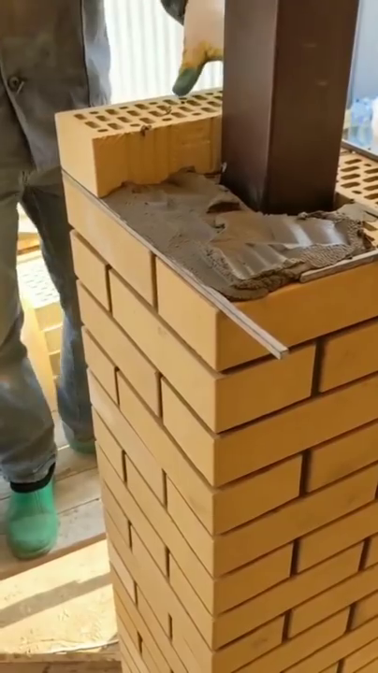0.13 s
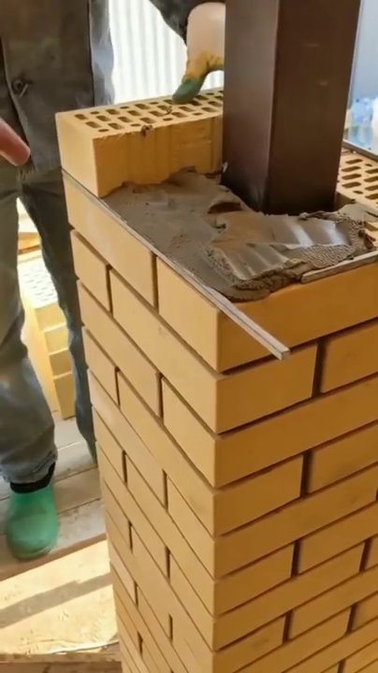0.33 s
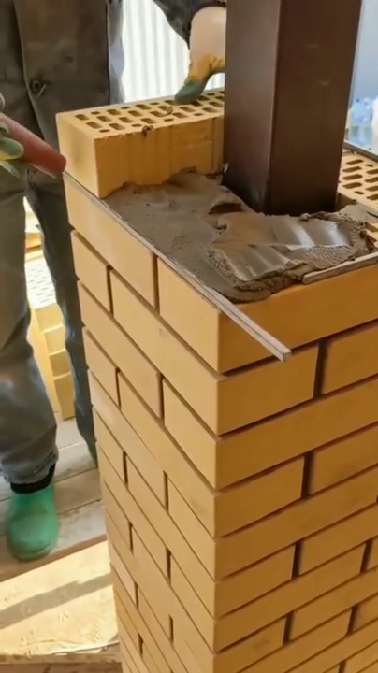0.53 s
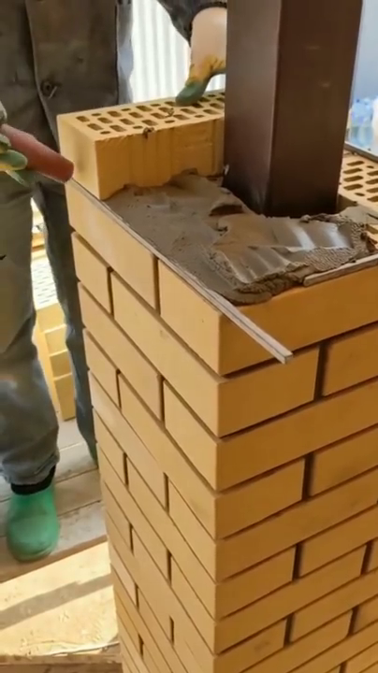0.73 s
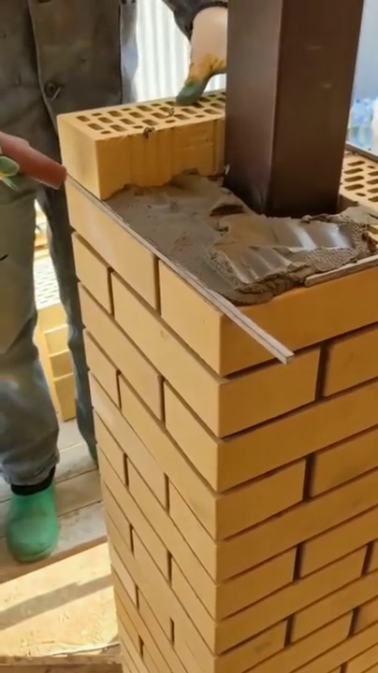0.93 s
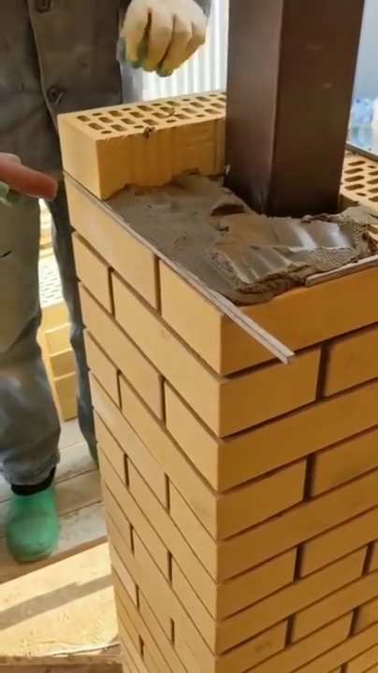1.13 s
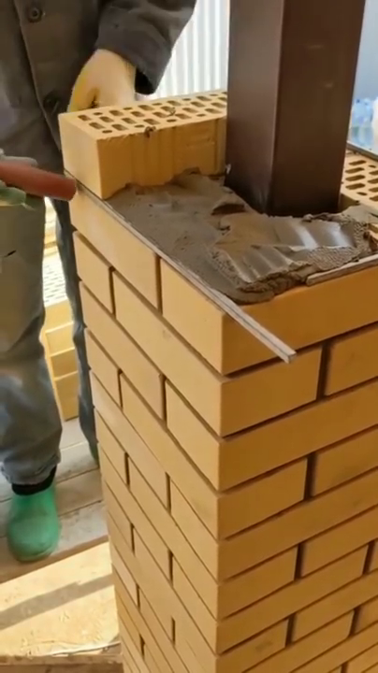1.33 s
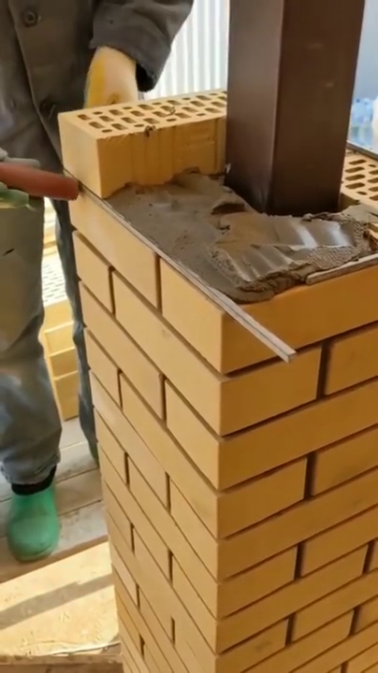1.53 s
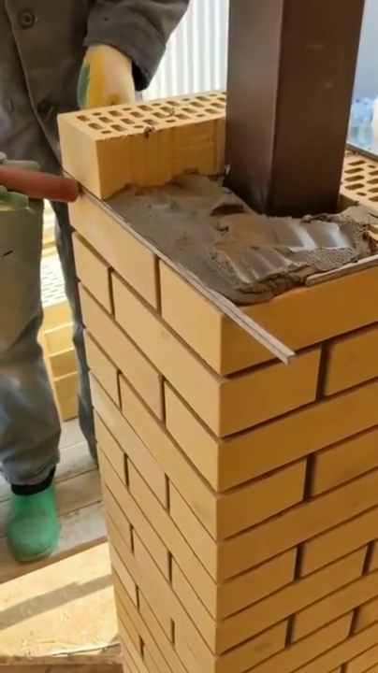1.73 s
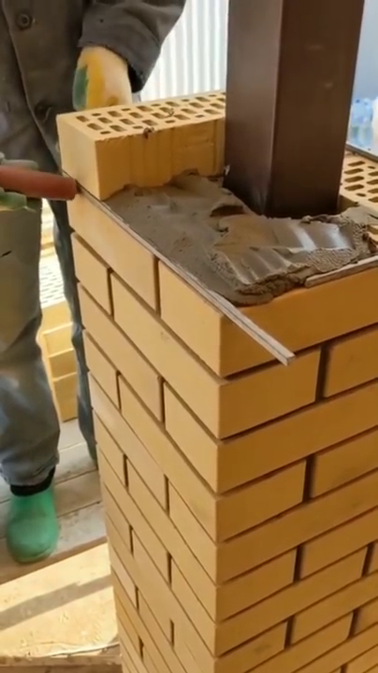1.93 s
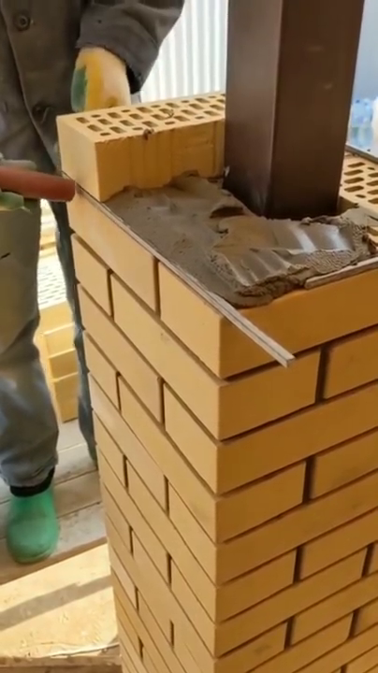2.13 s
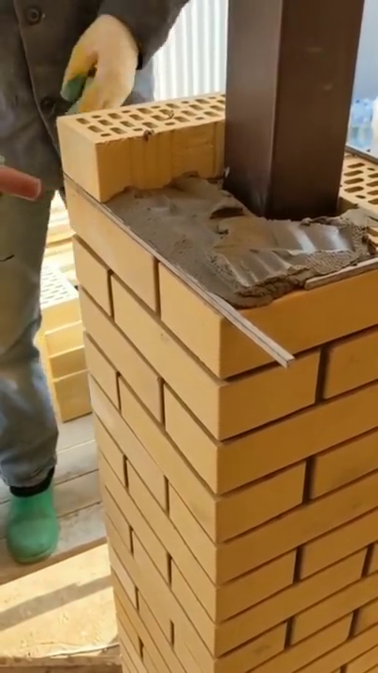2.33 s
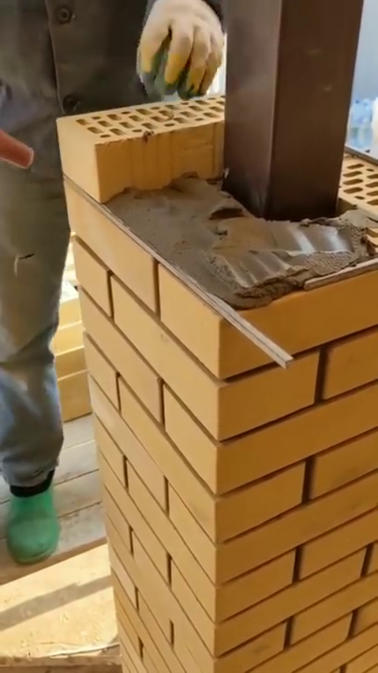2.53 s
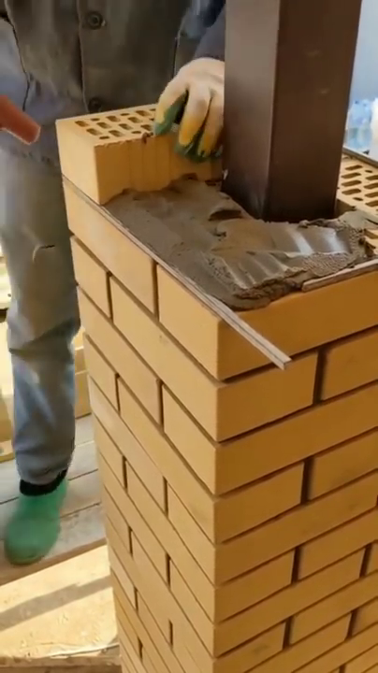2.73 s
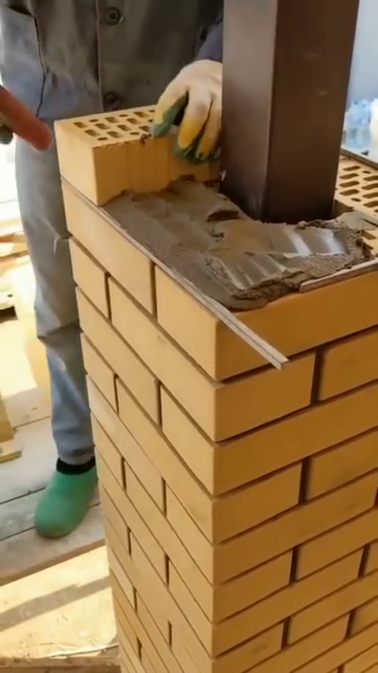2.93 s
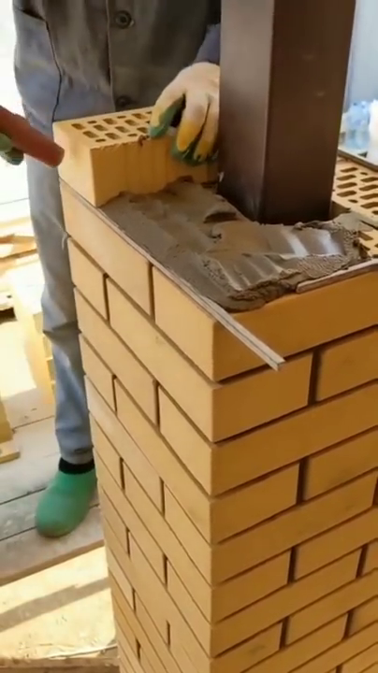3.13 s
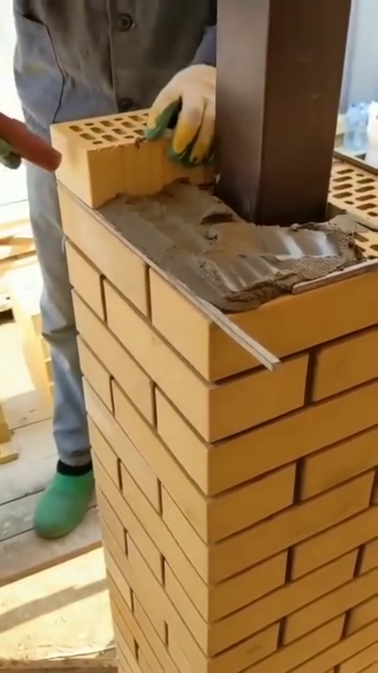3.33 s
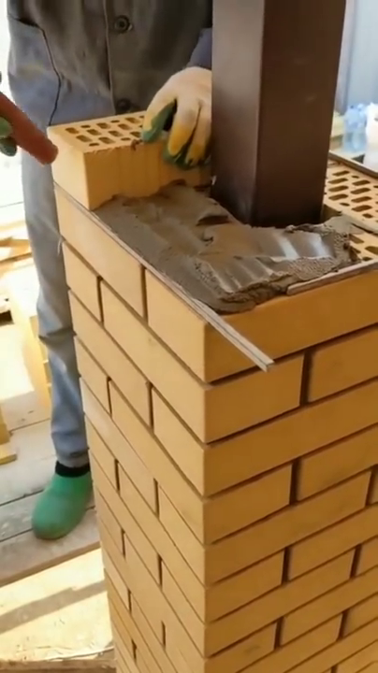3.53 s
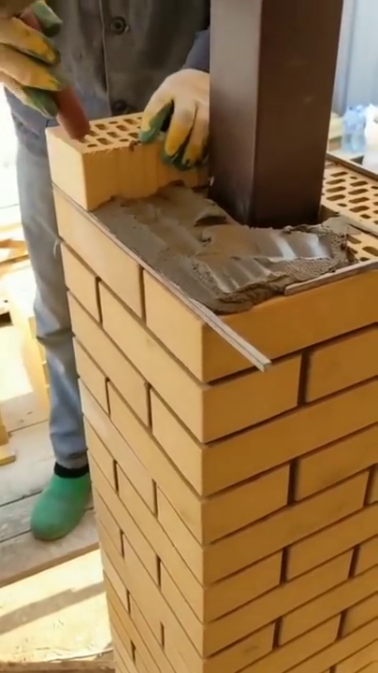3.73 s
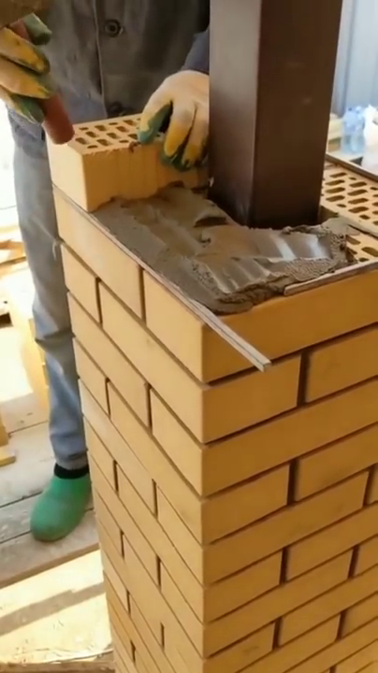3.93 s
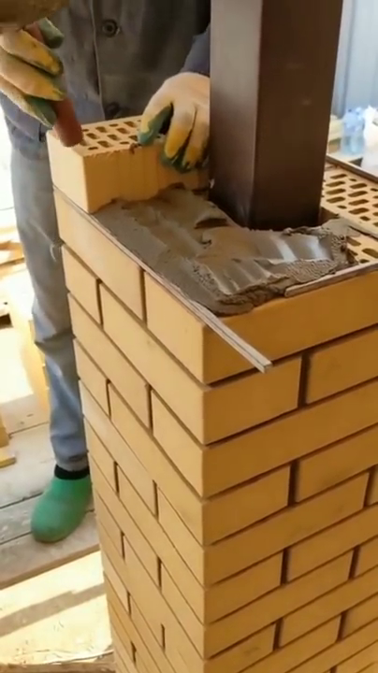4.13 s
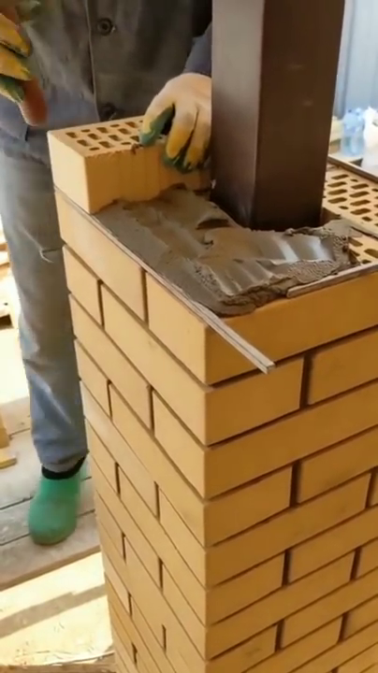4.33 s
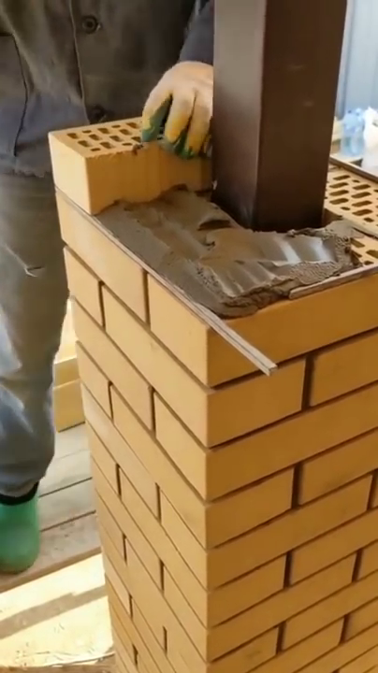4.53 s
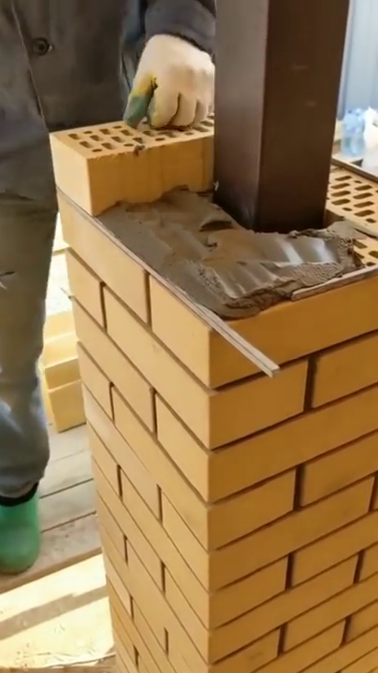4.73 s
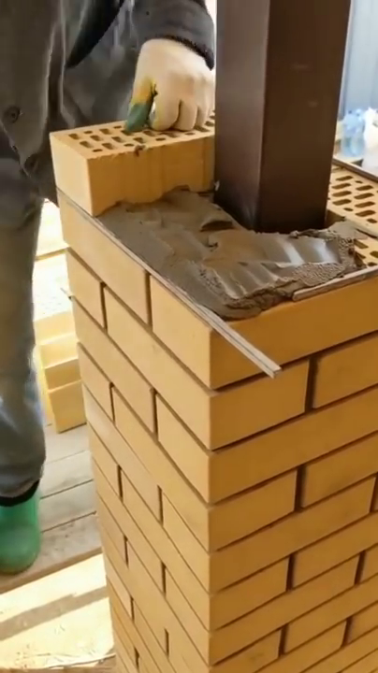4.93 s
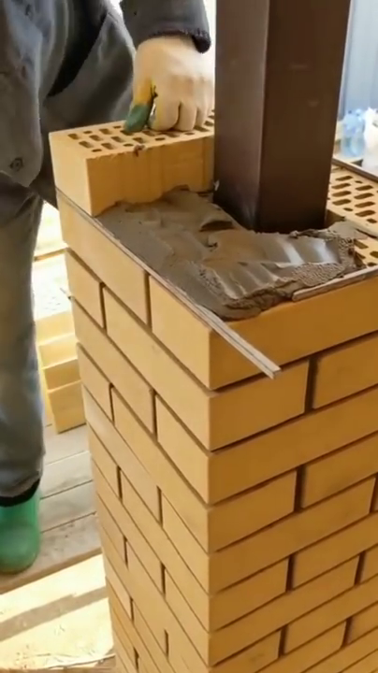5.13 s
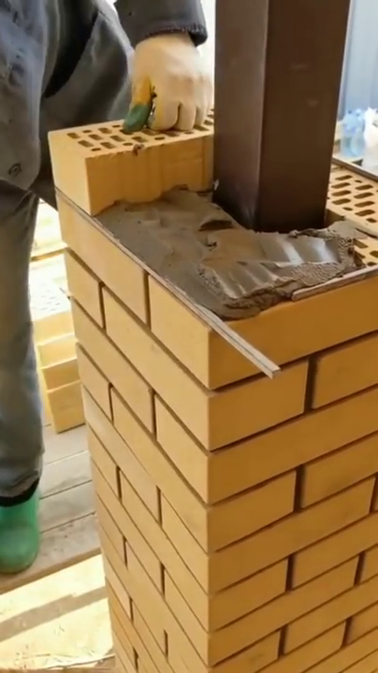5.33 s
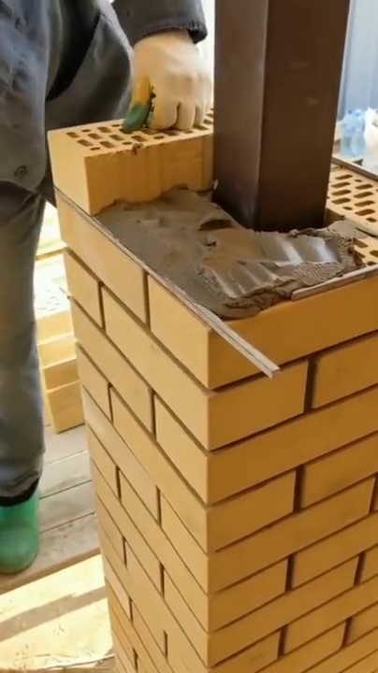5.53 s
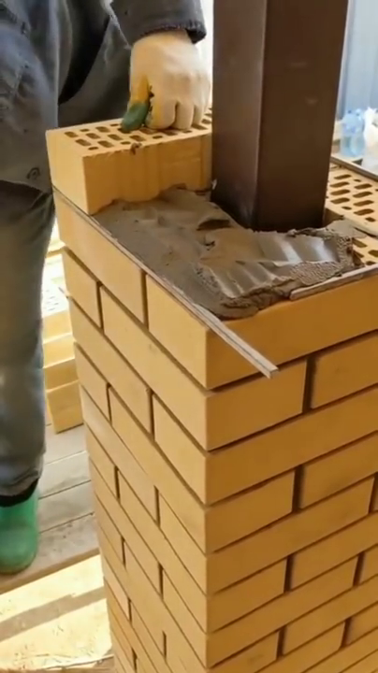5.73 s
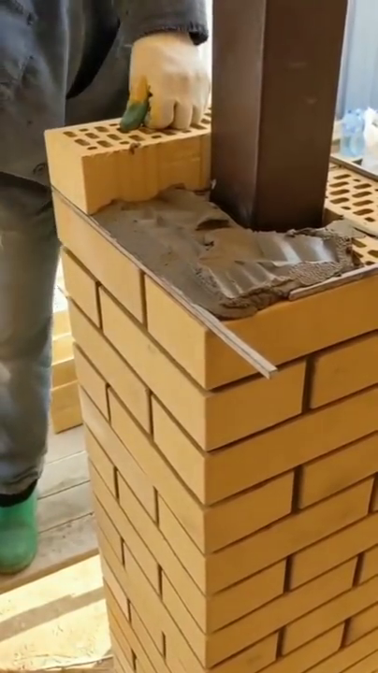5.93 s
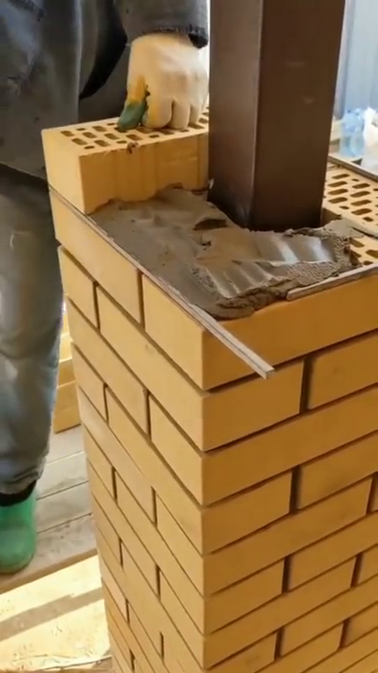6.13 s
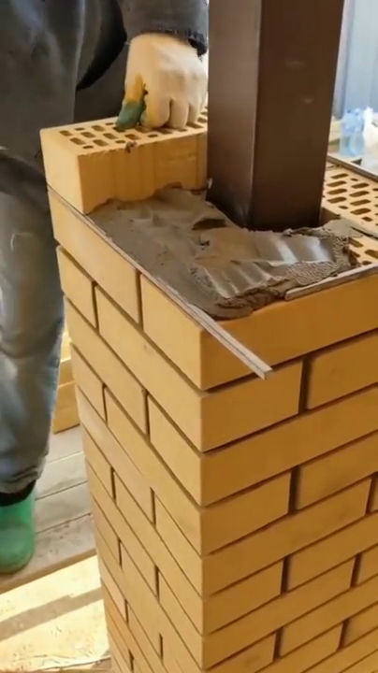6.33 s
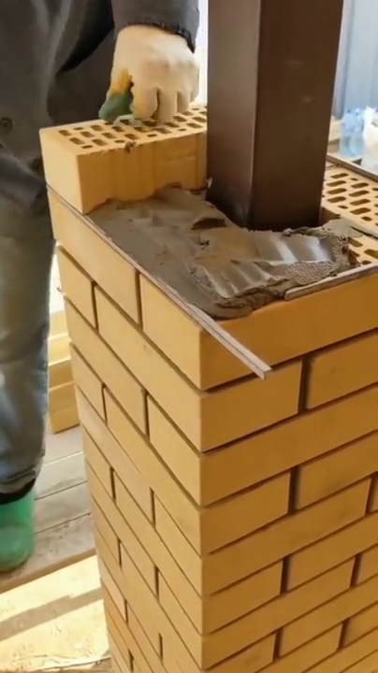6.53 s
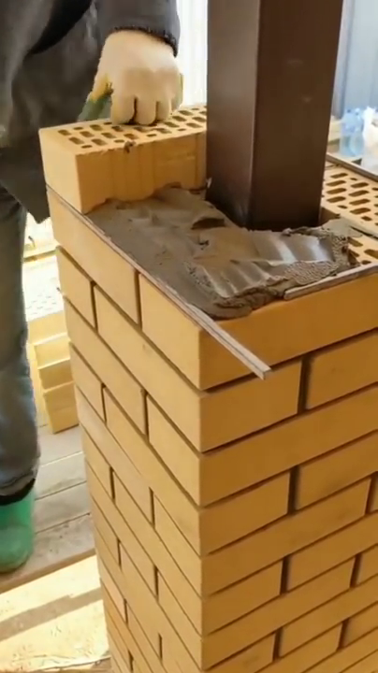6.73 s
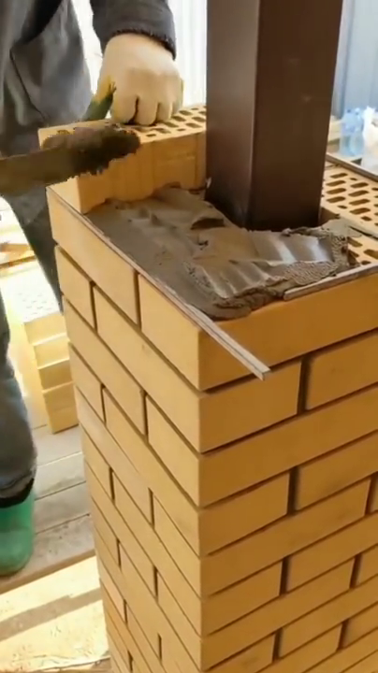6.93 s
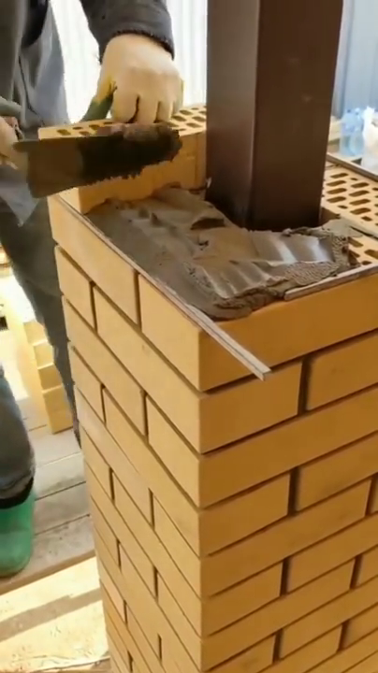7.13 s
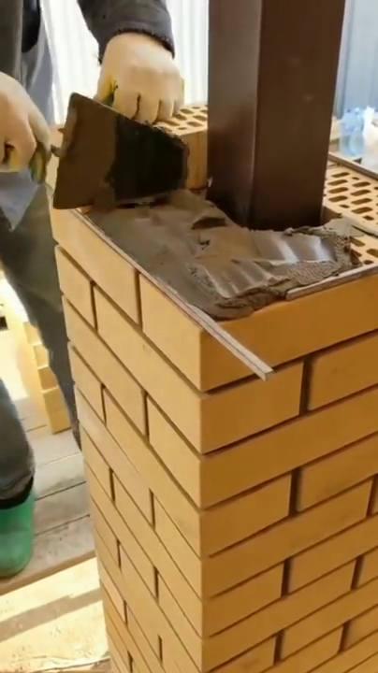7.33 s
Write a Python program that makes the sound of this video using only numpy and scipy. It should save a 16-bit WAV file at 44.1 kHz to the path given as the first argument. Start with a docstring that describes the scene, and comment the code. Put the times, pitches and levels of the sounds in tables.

```python
"""A short dying tone and gritty touches on a building site lead into a bricklayer's work with a steel trowel.
Two runs of taps with the handle knock a hollow clay brick into its mortar bed: modes of brick and blade ring.
Between the runs come a foot knock and drags of steel and soles over sandy mortar: grains excite resonances.
A faint hum follows, then soft rustles of noise; near the end the air rumbles up around a heavy bump.
Dull bumps (noisy thud plus low boom), lumpy air and a quiet hiss run through the whole scene."""
import sys
import numpy as np
from scipy import signal
from scipy.fft import rfft, irfft, next_fast_len
from scipy.io import wavfile

SR = 44100
rng = np.random.default_rng(int(sys.argv[2]) if len(sys.argv) > 2 else 0)


def master_out(mix):
    """Clip the mix to full scale and print it as 16-bit PCM to the path in sys.argv[1]."""
    frames = np.transpose(np.atleast_2d(mix))
    ceiling = np.clip(frames, -1, 1)
    pcm = np.round(ceiling * 32767).astype(np.int16)
    wavfile.write(sys.argv[1], SR, pcm)


N = 325017
TIME = np.arange(N) / SR
AGE = TIME[:SR // 2]   # half a second, the length of one knock

# The five pitch bands used to balance knocks and strokes. Each row: low edge in Hz, high edge in Hz.
BANDS = [(150, 700), (700, 1400), (1400, 3200), (3200, 7000), (7000, 14000)]
# Trowel taps and a few other knocks, such as a foot knock and the start of a scrape.
# Each row: time in seconds, relative level in dB, hardness of the contact in dB,
# strength of the low knock in dB, favoured pitch in Hz. KNOCK_BALANCE scales hardness and low knock.
KNOCKS = [(0.93, -36, -16, -3, 1200), (1.079, -35, -17.5, -2, 1190), (1.388, -30, -5, -2, 3870),
          (1.592, -26.5, -4.5, -1.5, 1920), (1.779, -21.5, 1, -5, 990), (1.909, -37, -9.5, 2.5, 1200),
          (1.98, -18.5, 0.5, -7, 4100), (2.16, -36.5, -12, -7, 1960), (2.18, -24, -4.5, -2.5, 2370),
          (2.324, -39, -14, 0.5, 1210), (2.472, -45.5, -2, 8, 1870), (3.037, -35, -6.5, -1, 1810),
          (3.198, -23.5, -4.5, -5.5, 1025), (3.385, -26, -1.5, -7, 2160), (3.583, -26, -4, -4.5, 1830),
          (3.765, -31, -6.5, 3, 2330), (3.95, -29, -4.5, -1.5, 2320), (4.141, -25.5, -10.5, -6, 1017),
          (4.317, -28, -8.5, -1.5, 1065)]
# Times in seconds at which the blows move on to another spot of the brick.
SPOT_CHANGES = [1.3, 3.0, 3.7]
# Ringing modes of brick and handle. Each row: pitch in Hz, time to fall by 60 dB in seconds,
# then four relative levels in dB, one for each spot struck.
BRICK_MODES = [(246, 0.22, -28, -11.5, -6.5, -1.5), (330.8, 0.17, 0, -3.5, -20, -2),
               (451.6, 0.13, -23, -6, -1, -10.5), (595, 0.13, -28, 1, 3, 2.5),
               (652, .25, -32, -1.5, -25, 1), (782, 0.37, -25, -13.5, -1, -0.5),
               (873, 0.21, 5, -11, -33, 0), (950, 0.2, 8, -8, 2, -3), (983, 0.15, 9, -6.5, 0, -15),
               (1067, 0.14, 9, -8.5, 0.5, -4), (1120, 0.38, -3, -3.5, -9, -15),
               (1185, 0.41, -2.5, -16, -15, -13), (1249, 0.2464, 3.5, -17.5, -13, -24),
               (1390, 0.23, -4, -0.5, -1, -17), (1507, 0.12, 7, 2, -13, -18.5),
               (1579, 0.28, 3, -3, 1.5, -28), (1788, 0.13, -21, -2, -8, -3), (1877, 0.12, -19, -3, -8, -63),
               (2044, .16, -16, -5, -18, -15), (2173, 0.08, -20, -3.5, -2, -1.5),
               (2217, 0.13, -7, -6, -2.5, -11), (2540, .22, -5.5, -12.5, -13, -5.5),
               (2720, 0.18, -25, -23, -6, -5), (3280, 0.021, -28, -7, 5, -3),
               (3600, 0.061, -32, -9, -4.5, -8)]
# Ringing modes of the steel blade, with the same columns as the brick.
BLADE_MODES = [(3980, 0.074, -32, -5.5, -6, -35), (4074, 0.018, -32, -1, -39, -42),
               (4120, 0.1128, -32, -17.5, -10, -19), (5430, .11, -32, -15, -26, -26),
               (5990, 0.11, -32, -9.5, -12, -30), (6025, .14, -32, -18.5, -13, -28),
               (7440, 0.16, -36, -20, -26, -28), (8000, 0.055, -38, -24, -35, -34)]
# Colour of a knock's dense clatter between the modes. Each row: pitch in Hz, relative level in dB.
CLATTER = [(60, -17), (150, 1), (260, -1), (420, 3.5), (500, -0.5), (600, 3.5), (1080, 0.5), (1320, -8),
           (1700, -4), (2350, 0.5), (3000, -8), (5000, -10.5), (8000, -18.5), (14000, -31.5)]
# A knock's balance, one row per band of BANDS. Each row: level in dB at hardness 0 and low knock 0,
# share of the hardness, share of the low knock (both plain factors).
KNOCK_BALANCE = [(0, 0, 1), (-3, 0, 0.082), (0.5, 0.032, 0.082), (0, 1.12, 0), (-6.5, 1.45, 0.12)]
# The surrounding walls. Each row: pitch in Hz, time for the reflections to fall by 60 dB in seconds.
ROOM_T60 = [(150, 0.5), (500, 0.29), (1500, 0.3), (4000, 0.23), (10000, 0.18)]
# Gritty strokes. Each row: start in seconds, length in seconds, relative level in dB, change over the
# stroke in dB, weight in the lows in dB, sharpness in dB, release in seconds.
# SCRAPE_BALANCE scales weight and sharpness.
SCRAPES = [(0.529, 0.071, -57.5, 5, 4.5, 3, 0.032), (2.526, 0.19, -41.5, 3.5, 3.5, 2.5, .032),
           (2.945, 0.057, -59, 8, 1, 4, 0.034), (3.037, .15, -44, 7.5, -5, -1, 0.035),
           (5.949, 0.019, -52.5, 3, 1.5, 4, .025), (6.012, 0.0091, -40.5, -3, -1.5, 0.5, 0.039),
           (7.13, 0.17, -63, 18.5, -3, 0, 0.12)]
# A stroke's balance, one row per band of BANDS. Each row: level in dB, share of the weight,
# share of the sharpness (both plain factors).
SCRAPE_BALANCE = [(-1.5, 1, 0), (-6, 0.91, 0.48), (1.5, 0.28, 0), (-4.5, 0.1, 0.68), (-13, 0.44, 1.06)]
# Colour of the grit. Each row: pitch in Hz, relative level in dB.
GRIT = [(100, -6), (240, -11), (430, -6.5), (510, -9.5), (700, -6.5), (930, -2), (1100, 1), (1330, -6),
        (1850, -5), (2900, -9.5), (3700, -9), (14000, -13.5)]
# Surface resonances under the grit. Each row: pitch in Hz, width in Hz (20 or more is used),
# relative level in dB.
GRIT_PEAKS = [(414, 21, -22), (621, 12, -16), (905, 8.3, -9), (1040, 14, 21), (1860, 160, -21.5),
              (2120, 60, 4), (2230, 50, 12), (2530, 69, -28.5)]
# Resonances that flare up under a dragging edge. Each row: peak time in seconds, level in dB,
# pitch in Hz, width in Hz.
RUBS = [(2.547, -32.5, 1930, 400), (2.57, -32.5, 2820, 350), (2.675, -31.5, 1091, 40),
        (2.68, -35, 1812, 60.7), (2.69, -34, 502, 120), (3.16, -37.5, 2510, 300)]
# Dull bumps. Each row: time in seconds, relative level in dB, pitch of the boom in Hz,
# fall of the boom in seconds, thud against boom in dB.
BUMPS = [(0.10, -32, 61.6, 0.017, -33), (0.527, -42, 141.3, 0.042, 1), (1.515, -36.5, 189, 0.035, 4.5),
         (1.912, -26.5, 149, 0.017, -4), (2.921, -28, 64, 0.0079, -29), (4.088, -37, 72, .018, -25),
         (4.59, -36.5, 129.7, 0.023, -2), (5.947, -36, 150.3, 0.051, -1), (6.138, -24, 58, 0.012, -18),
         (6.775, -29, 62, 0.076, -13.5), (6.855, -13.5, 84, .014, -6), (6.953, -27.5, 95, 0.0093, -7.5),
         (7.206, -27, 66.7, 0.017, -27)]
# Faint tones on the site. Each row: peak time in seconds, pitch in Hz, level in dB, rise in seconds,
# fall in seconds.
TONES = [(0, 895, -43, .002, 0.022), (0, 309, -43, .002, 0.014), (4.6, 691, -61.5, 0.45, .9)]
# Glove rustles and crumbs of mortar. Each row: peak time in seconds, level in dB, fall in seconds,
# top pitch in Hz.
RUSTLES = [(.435, -58, .033, 3940), (1.22, -54.5, .025, 1490), (4.571, -56, 0.14, 2120),
           (4.845, -57.5, 0.052, 4160), (5.38, -63, 0.033, 990), (6.23, -60.5, 0.076, 1180),
           (6.594, -61.5, 0.014, 2950), (6.797, -57, 0.043, 2600), (6.905, -53, 0.019, 4200)]
# Strength of the moving air. Each row: time in seconds, rumble level in dB before the lumps are added.
AIR = [(0.0, -58), (0.45, -60), (0.98, -64), (1.68, -55), (4.29, -57), (4.41, -60), (5.75, -61.5),
       (6.08, -47), (6.53, -61), (6.73, -58.5), (6.94, -49), (7.37, -44)]
# Colour of the air noise inside each air band. Each row: pitch in Hz, relative level in dB.
AIR_COLOUR = [(15, -42), (25, -18.5), (45, 6.5), (90, 3.5), (130, -1.5), (220, -5.5), (330, -7.5),
              (480, -11), (700, -12.5), (1200, -19), (2300, -20.5), (4000, -26.5), (6000, -25),
              (14000, -35.5)]
# Rumble, middle and treble of the background. Each row: low edge in Hz, high edge in Hz.
AIR_BANDS = [(25, 200), (200, 3000), (3000, 14000)]

FAVOURED_BAND_DB = 2.5   # lift of the band that holds the favoured pitch
SOFT_RING_SHARE = 0.17   # dB more ring for each dB that a contact is softer
# Knocks above the first level leave a short hiss; above the second the hiss grows no louder.
FIRM_DB, HISS_LIMIT_DB = -33, -24.5
RUB_RISE_S, RUB_FALL_S = 0.029, 0.041
BUMP_RISE_SHARE = 0.75   # rise of the boom as a share of its fall
THUD_RISE_S, THUD_FALL_SHARE = 0.0024, 0.64   # the share is of the boom's fall
THUD_TOP_RATIO = 4   # top of the thud as a multiple of the boom's pitch
RUSTLE_RISE_SHARE = 0.32   # rise as a share of the fall
SITE_MIDDLE_DB, SITE_TREBLE_DB = -59.5, -70.5   # site hiss before its slight flutter
CUTOFF_HZ = 14200


def knocks(level_db=-5.5, travel_s=0.002, hiss_db=-22.5):
    """Trowel taps and a few other knocks: hard contacts add treble, and firmer ones leave a short hiss."""
    out = np.zeros(N + len(AGE))
    base_db, hard_share, low_share = np.transpose(KNOCK_BALANCE)
    for s, db, hardness_db, low_knock_db, favoured_hz in KNOCKS:
        start = round((s + travel_s) * SR)
        spot = np.searchsorted(SPOT_CHANGES, s)
        favoured = np.array([low <= favoured_hz < high for low, high in BANDS])
        band_db = db + base_db + hard_share * hardness_db + low_share * low_knock_db
        band_db = band_db + FAVOURED_BAND_DB * favoured
        blow = knock(spot, band_db, favoured_hz, -SOFT_RING_SHARE * hardness_db)
        hiss_gain = (db > FIRM_DB) * from_db(hiss_db + min(db, HISS_LIMIT_DB))
        out[start:start + len(AGE)] += blow + hiss_gain * held_hiss()
    return from_db(level_db) * out[:N]


def knock(spot, band_db, favoured_hz, free_ring_db, rise_s=0.0021):
    """One blow: a crack, ringing modes, reflections and a low thump, balanced band by band."""
    blow = 2 * energy_one(near_echoes(clatter())) + ring(spot, favoured_hz, free_ring_db) + thump()
    # Bright blows crush grit first and build up more slowly.
    crunch_s = rise_s * from_db(band_db[3] - band_db[2])
    blow = blow * (1 - np.exp(-AGE / crunch_s))
    attack = SR // 25   # the first 40 ms set the balance
    for _ in range(2):   # the second pass refines the first
        balance = []
        for (low, high), db in zip(BANDS, band_db):
            present_db = 20 * np.log10(np.std(band(blow[:attack], low, high)))
            balance.append((np.sqrt(low * high), db - present_db))
        blow = coloured(blow, balance)
    return blow


def ring(spot, favoured_hz, free_ring_db, ring_db=-8.5, scatter_db=2.0, favour_db=10.5, favour_width=0.07):
    """Brick and blade ring as a sum of dying sines; the struck spot sets the strength of each mode."""
    modes = np.array(BRICK_MODES + BLADE_MODES)
    hz, t60, mode_db = modes[:, 0], modes[:, 1], modes[:, 2 + spot]
    # Modes that move most at the struck point are struck hardest.
    closeness = np.exp(-(np.log(hz / favoured_hz) / favour_width) ** 2)
    mode_db = mode_db + favour_db * closeness
    strengths = from_db(ring_db + free_ring_db + mode_db + scatter_db * rng.standard_normal(len(hz)))
    pitches = hz * (1 + 0.004 * rng.standard_normal(len(hz)))   # grip and bedding shift the modes a little
    phases = rng.uniform(0, 2 * np.pi, len(hz))
    return sum(gain * energy_one(np.sin(2 * np.pi * f * AGE + phase) * dying(t))
               for gain, f, t, phase in zip(strengths, pitches, t60, phases))


def clatter(crack_db=2.0, crack_t60=0.032, strike_db=4.0, strike_t60=0.011):
    """The contact cracks as a dying burst of noise, and walls return it as a diffuse tail."""
    contact = dying(crack_t60) + from_db(strike_db) * dying(strike_t60)   # the first milliseconds stand out
    burst = rng.standard_normal(len(AGE)) * contact
    crack = energy_one(signal.lfilter([1, -1], [1, -0.92], burst))   # less bass
    return energy_one(coloured(from_db(crack_db) * crack + room_tail(), CLATTER))


def thump(thump_db=-18.0, thump_hz=80):
    """The whole pier takes the blow and answers with one low dying sine."""
    return from_db(thump_db) * energy_one(np.sin(2 * np.pi * thump_hz * AGE) * dying(0.31))


def near_echoes(x, count=6, echo_db=-11.5):
    """Pier, post and hand throw the sound back within a few milliseconds and ripple its spectrum."""
    lags = rng.uniform(0.0006, 0.004, count)
    echoes = sum(np.pad(x, (round(lag * SR), 0))[:len(x)] * (-1) ** k for k, lag in enumerate(lags))
    return x + from_db(echo_db) * echoes


def room_tail(echo_s=0.036, echo_db=-12.0):
    """Diffuse reflections die band by band; a second cluster returns from a farther wall."""
    edges = np.geomspace(40, 16000, 10)
    tail = sum(band(rng.standard_normal(len(AGE)), low, high) * dying(at_hz(ROOM_T60, np.sqrt(low * high)))
               for low, high in zip(edges, edges[1:]))
    far_wall = np.interp(AGE - echo_s, AGE, dying(0.11), left=0) * rng.standard_normal(len(AGE))
    return energy_one(tail + from_db(echo_db) * far_wall)


def held_hiss(hold_s=0.091, stop_s=0.008, low_hz=2500, tilt_hz=4500, clump_db=4.0):
    """A thin, clumped high hiss holds for about 90 ms after a firmer knock, then stops."""
    knots = AGE[::200]
    clumps = np.interp(AGE, knots, rng.standard_normal(len(knots)))
    noise = rng.standard_normal(len(AGE)) * from_db(clump_db * clumps)
    hiss = band(noise, low_hz, low_hz + tilt_hz, order=1)
    return rms_one(hiss) * (1 - np.tanh((AGE - hold_s) / (2 * stop_s))) / 2


def scrapes(grains_per_s=1500, grain_db=4.0, body_db=-2.5, judder_db=0.9, rise_s=0.0049):
    """Sand grains crack under a dragging edge and set the surface ringing; the pressure judders."""
    sizes = from_db(grain_db * np.minimum(rng.exponential(1, N), 4)) * rng.choice([-1, 1], N)
    grains = sizes * (rng.random(N) < grains_per_s / SR) * from_db(judder_db * drift(53))
    body = sum(from_db(db) * rms_one(signal.lfilter(*signal.iirpeak(hz, hz / max(width, 20), fs=SR), grains))
               for hz, width, db in GRIT_PEAKS)
    grit = rms_one(coloured(grains, GRIT)) + from_db(body_db) * rms_one(body)
    grit = grit + signal.fftconvolve(grit, room_tail())[:N]
    grit_bands = np.array([rms_one(band(grit, low, high)) for low, high in BANDS])
    base_db, weight_share, sharp_share = np.transpose(SCRAPE_BALANCE)
    out = np.zeros(N)
    for start, length, db, swell_db, weight_db, sharp_db, release_s in SCRAPES:
        gains = from_db(db + base_db + weight_share * weight_db + sharp_share * sharp_db)
        out += pressure(start, length, swell_db, rise_s, release_s) * (gains @ grit_bands)
    return out


def pressure(start, length, swell_db, rise_s, release_s):
    """A stroke bites, its pressure changes steadily, and it is let go."""
    age = TIME - start
    outside = np.maximum(-age, 0) / rise_s + np.maximum(age - length, 0) / release_s
    return from_db(swell_db * np.clip(age / length, 0, 1)) * np.exp(-np.minimum(outside, 20))


def rub():
    """A dragging edge wakes one rough resonance after another, each a swelling band of noise."""
    out = np.zeros(N)
    for s, db, hz, width in RUBS:
        rough = rms_one(band(rng.standard_normal(N), hz - width / 2, hz + width / 2))
        out += from_db(db) * swell(s, RUB_RISE_S, RUB_FALL_S) * rough
    return out


def bumps(wobble=0.15):
    """Each bump is a short noisy thud and a slightly later, unsteady low boom."""
    out, white, wander = np.zeros(N), rng.standard_normal(N), np.cumsum(drift(60)) / SR
    for s, db, hz, fall, thud_db in BUMPS:
        rise = BUMP_RISE_SHARE * fall
        boom = swell(s + rise, rise, fall) * np.sin(2 * np.pi * hz * (TIME - s + wobble * wander))
        noise = rms_one(band(white, 80, max(THUD_TOP_RATIO * hz, 150)))
        thud = swell(s, THUD_RISE_S, THUD_FALL_SHARE * fall) * noise
        out += from_db(db) * (boom + from_db(thud_db) * thud) / np.sqrt(2)
    return out


def tones(waver=0.0039):
    """A dying ring and a faint hum: sines whose pitch wavers slightly."""
    clock = TIME + waver * np.cumsum(drift(17.6)) / SR
    return sum(from_db(db) * swell(s, rise, fall) * np.sin(2 * np.pi * hz * clock)
               for s, hz, db, rise, fall in TONES)


def rustles(low_hz=700, clump_db=1.0):
    """Gloves and crumbs of mortar make short puffs of clumped fine noise."""
    grains = rng.standard_normal(N) * from_db(clump_db * drift(200))
    return sum(from_db(db) * swell(s, RUSTLE_RISE_SHARE * fall, fall)
               * rms_one(band(grains, low_hz, top_hz, order=1))
               for s, db, fall, top_hz in RUSTLES)


def handling(touches_per_s=7, touch_db=-59.5, spread_db=2.0, fall_s=0.03, low_hz=250, top_hz=2200):
    """Gloves and clothes brush faintly against the brickwork at random moments."""
    sizes = from_db(spread_db * np.minimum(rng.exponential(1, N), 2))
    touches = sizes * (rng.random(N) < touches_per_s / SR)
    one_touch = swell(fall_s, RUSTLE_RISE_SHARE * fall_s, fall_s)[:len(AGE)]
    envelope = signal.fftconvolve(touches, one_touch)[:N]
    brush = band(rng.standard_normal(N), low_hz, top_hz, order=2)
    return from_db(touch_db) * envelope * rms_one(coloured(brush, AIR_COLOUR))


def background(lumps_db=4.5, flutter_db=1.02):
    """Moving air rumbles in lumps under the nearly even hiss of the site, all from filtered noise."""
    noise = coloured(rng.standard_normal(N), AIR_COLOUR)
    levels = [np.interp(TIME, *np.transpose(AIR)) + lumps_db * drift(37),
              SITE_MIDDLE_DB + flutter_db * drift(14),
              SITE_TREBLE_DB + flutter_db * drift(14)]
    return sum(from_db(db) * rms_one(band(noise, low, high)) for db, (low, high) in zip(levels, AIR_BANDS))


def swell(s, rise, fall):
    """Envelope that rises smoothly to 1 at time s and dies away."""
    age = TIME - s
    return np.exp(-np.minimum(np.where(age < 0, (age / rise) ** 2, age / fall), 20))


def dying(t60):
    """Exponential decay over half a second, losing 60 dB in t60 seconds."""
    return np.exp(-np.log(1000) * AGE / max(t60, 1e-3))


def drift(rate):
    """Slow random wandering with spread 1, up to about the given rate in Hz."""
    sos = signal.butter(2, rate, fs=SR, output="sos")
    return rms_one(signal.sosfilt(sos, rng.standard_normal(N + SR))[SR:])


def band(x, low, high, order=4):
    """Keep the sound between two pitches (Butterworth band-pass)."""
    return signal.sosfilt(signal.butter(order, [low, high], "band", fs=SR, output="sos"), x)


def coloured(x, spectrum):
    """Filter with the given (Hz, dB) curve, without sound ahead of its cause (minimum phase)."""
    size = 2 * next_fast_len(len(x))
    curve_db = at_hz(spectrum, np.fft.rfftfreq(size, 1 / SR))
    cepstrum = irfft(np.log(from_db(curve_db)))
    # Folding the cepstrum forward in time gives the minimum phase.
    cepstrum[1:size // 2] *= 2
    cepstrum[size // 2 + 1:] = 0
    return irfft(rfft(x, size) * np.exp(rfft(cepstrum)))[:len(x)]


def at_hz(points, hz):
    """Read (Hz, value) points on a log-frequency axis."""
    points = np.array(points)
    return np.interp(np.log(np.maximum(hz, 1)), np.log(points[:, 0]), points[:, 1])


def from_db(db):
    """Decibels to gain."""
    return 10 ** (np.asarray(db) / 20)


def rms_one(x):
    """Scale to an rms level of 1."""
    return x / np.sqrt(np.mean(x ** 2) + 1e-20)


def energy_one(x):
    """Scale to a total energy of 1."""
    return rms_one(x) / np.sqrt(len(x))


def scene():
    """Everything at one microphone."""
    work = knocks() + scrapes() + rub()
    surroundings = bumps() + tones() + rustles() + handling() + background()
    return (work + surroundings)[None]


def record(dry, low_cut_hz=36):
    """The microphone loses the deepest bass; the top is cut steeply."""
    dry = signal.sosfilt(signal.butter(2, low_cut_hz, "high", fs=SR, output="sos"), dry)
    return signal.sosfilt(signal.ellip(12, 0.2, 90, CUTOFF_HZ, fs=SR, output="sos"), dry)


dry = scene()
out = record(dry)
master_out(out)
```